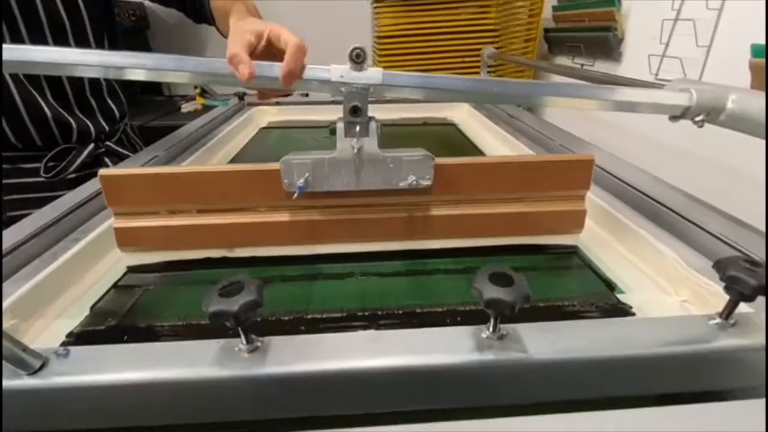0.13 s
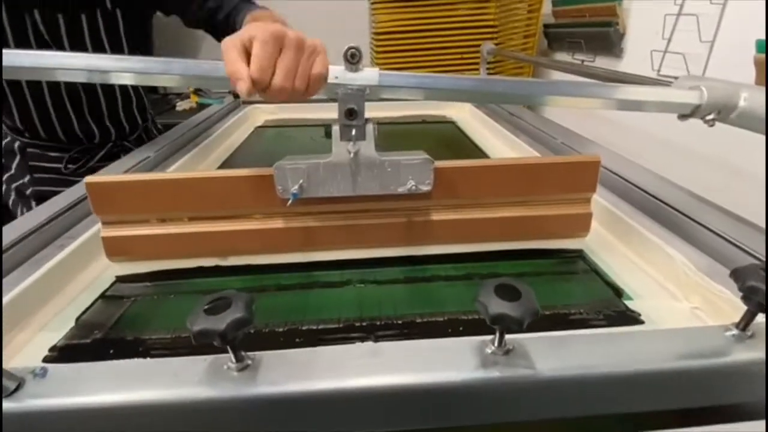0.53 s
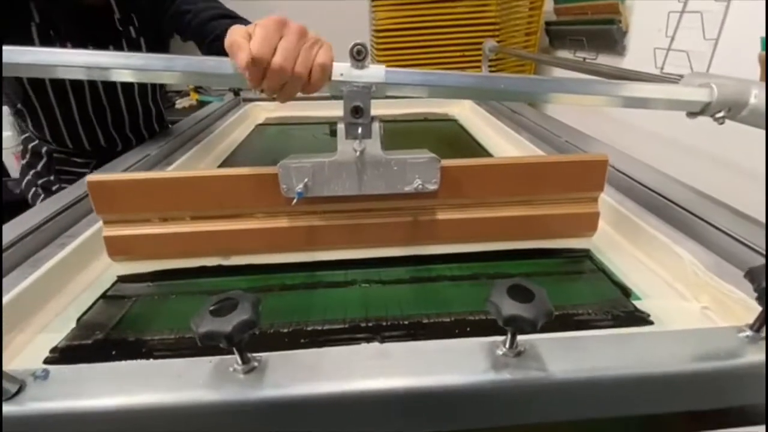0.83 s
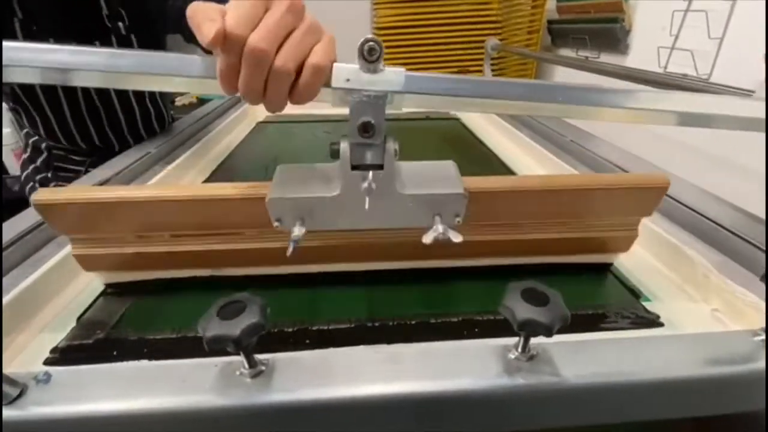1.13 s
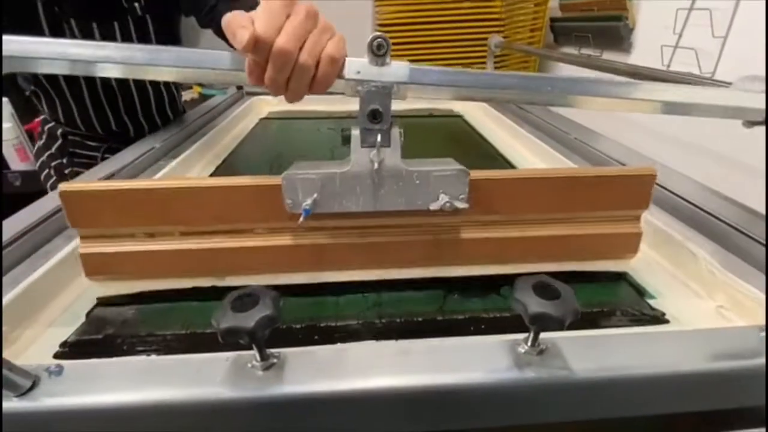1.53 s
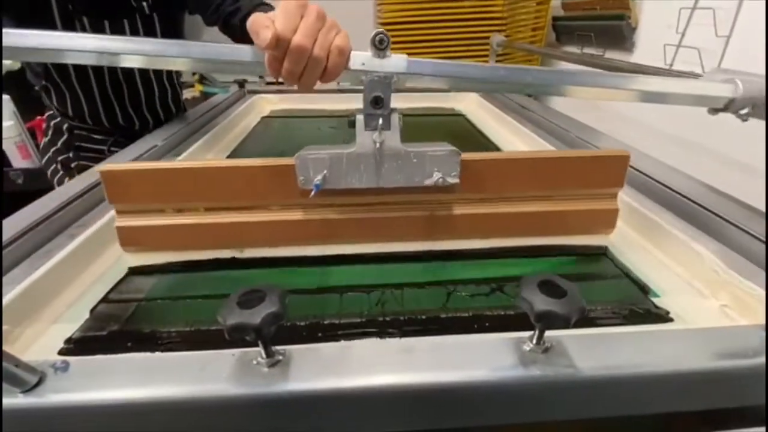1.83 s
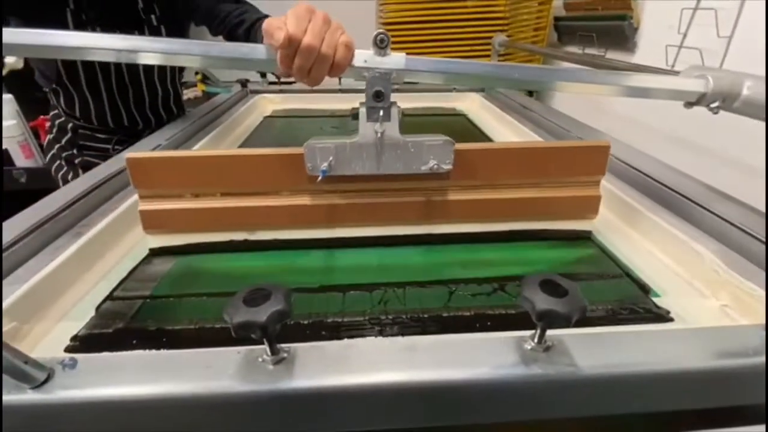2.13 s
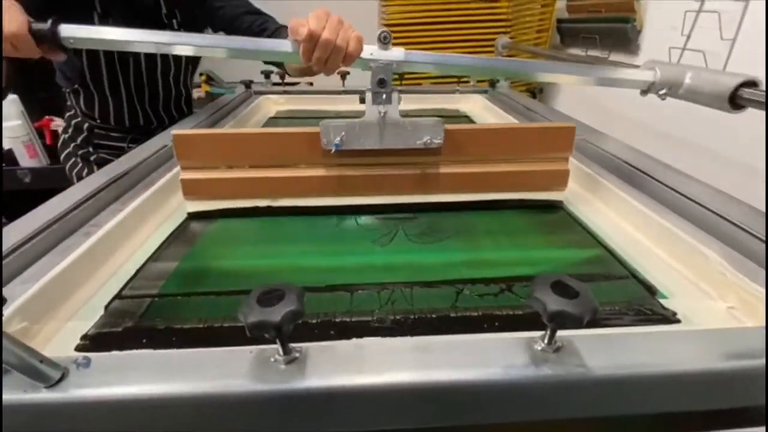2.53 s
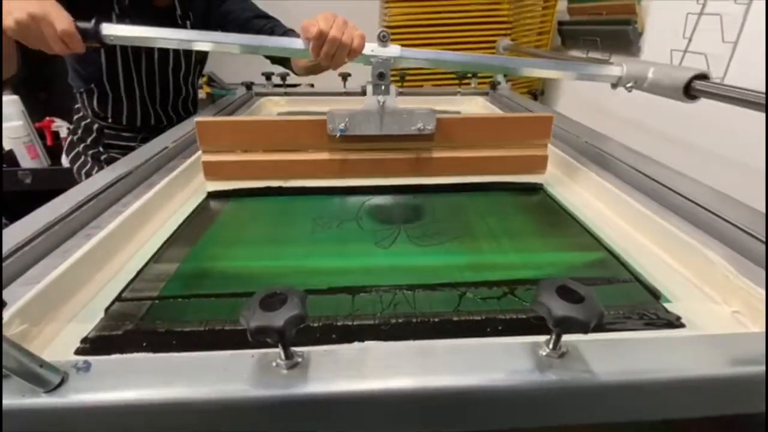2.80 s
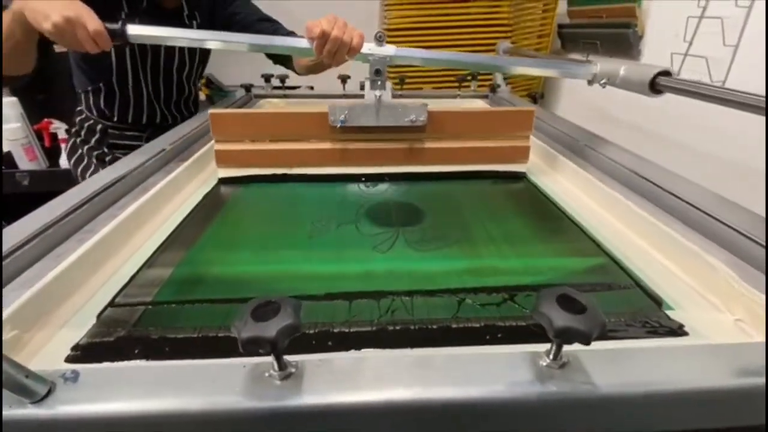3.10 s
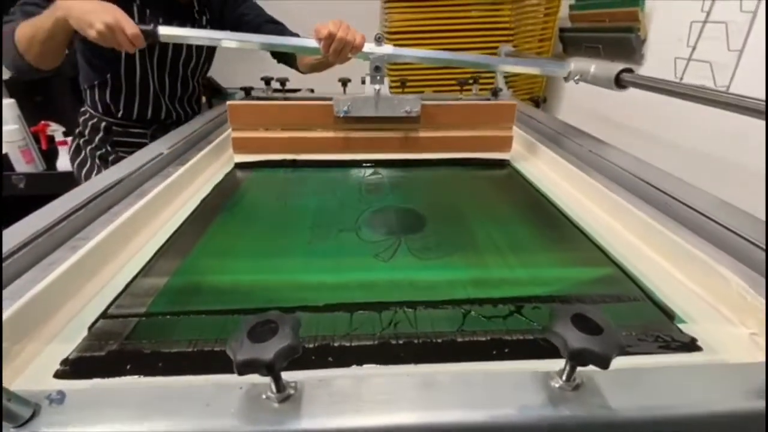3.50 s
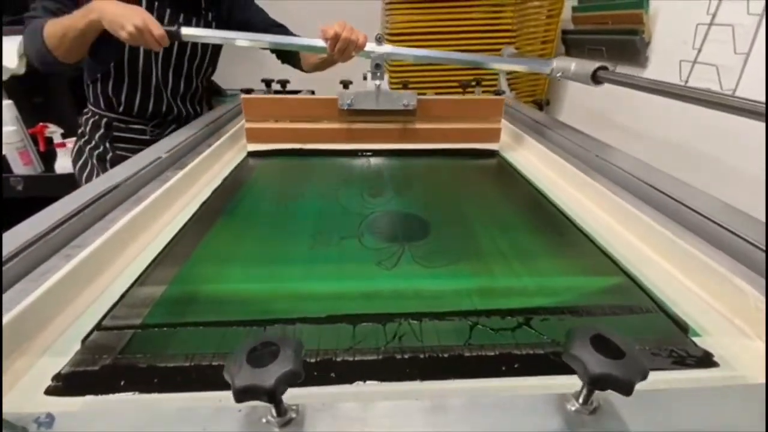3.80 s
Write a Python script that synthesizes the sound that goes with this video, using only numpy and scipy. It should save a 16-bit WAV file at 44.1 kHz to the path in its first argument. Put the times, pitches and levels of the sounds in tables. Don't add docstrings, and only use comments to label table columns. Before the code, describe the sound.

A squeegee zips across a screen-printing mesh, with a hard metallic clack, over steady fan roar

```python
import sys
import numpy as np
from scipy import signal
from scipy.fft import rfft, irfft, next_fast_len
from scipy.io import wavfile
from scipy.ndimage import uniform_filter1d, minimum_filter1d, map_coordinates

SR = 44100
rng = np.random.default_rng(int(sys.argv[2]) if len(sys.argv) > 2 else 0)


def generate_wav(signal):
    frames = np.transpose(np.atleast_2d(signal))
    scaled = np.clip(frames, -1, 1) * 32767
    pcm = np.round(scaled).astype(np.int16)
    wavfile.write(sys.argv[1], SR, pcm)


def amplitude_ratio(level_db):
    exponent = np.asarray(level_db, float) / 20
    return 10 ** exponent


N = 174195


def unit(x):
    return x / np.sqrt(np.mean(x ** 2) + 1e-20)


def along(points, hz):
    f, v = np.transpose(points)
    return np.interp(np.log(hz + 1), np.log(f + 1), v)


def wobble(rate):
    return map_coordinates(rng.standard_normal(1000), [np.arange(N) * rate / SR])


def filtered(x, response):
    m = next_fast_len(N + SR // 2)
    return irfft(rfft(x, m) * response(np.fft.rfftfreq(m, 1 / SR)), m)[..., :N]


def lean(x, points):
    return filtered(x, lambda f: amplitude_ratio(along(points, f) * [[.5], [-.5]]))


def peaks(table, f):
    power = 0
    for centre, width, db in table:
        power = power + (amplitude_ratio(db) * f * width) ** 2 / ((centre ** 2 - f ** 2) ** 2 + (f * width) ** 2)
    return np.sqrt(power)


def rush(gain, alike, patchy_db):
    z = signal.stft(rng.standard_normal((2, N)), nperseg=512)[2]
    field = uniform_filter1d(rng.standard_normal(z.shape[1:]), size=6, axis=0)
    field = uniform_filter1d(field, size=10, axis=1)
    pair = signal.istft(z * amplitude_ratio(patchy_db * unit(field)), nperseg=512)[1][:, :N]

    def share(hz):
        angle = np.arccos(np.clip(along(alike, hz), -1, 1)) / 2
        return gain(hz) * [np.cos(angle), np.sin(angle)]

    mid, side = filtered(pair, share)
    return unit(np.array([mid + side, mid - side]))


# frequency in Hz, level in dB per Hz.
FAN_ROAR = [(15, -61), (25, -23), (123, -3.5), (355, -11.5), (536, -12), (1670, -19), (8440, -41.5),
            (10600, -44.5), (11800, -82), (15300, -118), (22000, -120)]
# frequency in Hz, width in Hz, level over the roar in dB.
TABLE_CAVITIES = [(83.6, 8.6, 7), (137.2, 21.8, 11), (349.8, 33, 15), (614, 49, 3), (683, 24, 4),
                  (1656, 30, 8), (1650, 590, 2.5)]
# frequency in Hz, likeness (1 is the same).
FAN_ALIKE = [(60, 1), (170, 0.99), (490, 0.71), (1400, 0.049), (4010, 0.2), (11500, 0.075)]
# frequency in Hz, left over right in dB.
FAN_LEAN = [(60, -2), (220, 2.5), (830, 2), (3090, 2.5), (11500, -3.5)]


def fan():
    roar = rush(lambda f: amplitude_ratio(along(FAN_ROAR, f)) * np.hypot(1, peaks(TABLE_CAVITIES, f)), FAN_ALIKE, 1.64)
    level_db = -30 + 0.44 * wobble(4.4)
    return amplitude_ratio(level_db) * lean(roar, FAN_LEAN)


# middle in seconds, frequency in Hz, level in dB, half length in seconds.
BOOMS = [
    (.05, 132.7, -33.5, 0.051),
    (1.3, 127, -32.5, 0.054),
    (1.97, 139, -30.5, 0.061),
    (2.17, 141, -31, .025),
    (2.28, 144.7, -27.5, 0.048),
    (2.5, 139, -30.5, 0.035),
    (2.71, 142, -32.5, 0.024),
    (2.93, 132, -26, 0.072),
    (3.64, 138, -31.5, 0.052),
    (3.92, 131, -31, .05),
]


def booms():
    t = np.arange(N) / SR
    out = np.zeros(N)
    for s, hz, db, half_s in BOOMS:
        out += amplitude_ratio(db + 2.5) * np.exp(-((t - s) / half_s) ** 2) * np.sin(2 * np.pi * hz * (t - s))
    return out


def blur(n, width_hz):
    z = rng.standard_normal((3, n)) + 1j * rng.standard_normal((3, n))
    f = np.fft.fftfreq(n, 1 / SR)
    core = np.exp(-(f / width_hz) ** 2)
    haze = amplitude_ratio(-19) * np.exp(-(f / (width_hz + 485)) ** 2)
    z = np.fft.ifft(z * (core + haze))
    z = 0.48 * z[0] + z[1:]
    return z / np.sqrt(np.mean(abs(z) ** 2))


# time in seconds, threads passed per second in Hz, level in dB.
END_STROKE = [(0.0, 1420, -47), (0.024, 1549, -46), (0.064, 1460, -38), (0.12, 925.4, -45)]
NUDGE = [(0.955, 1525, -46), (0.966, 1613, -39), (1.03, 1660, -51)]
SHORT_STROKE = [(1.61, 1036, -40.5), (1.644, 1667, -39.5), (1.69, 1925, -39), (1.746, 1577, -34),
                (1.764, 1263, -33), (1.79, 1037, -40), (1.824, 774.5, -41), (1.868, 689, -39),
                (1.9, 659, -50)]
TWITCHES = [
    [(1.9, 1090, -41), (1.915, 1106, -39), (1.93, 1100, -48)],
    [(2.73, 1030, -46), (2.76, 1027, -41), (2.79, 1000, -49)],
    [(3.59, 1030, -49), (3.62, 1058, -43), (3.65, 1057, -49)],
]
LONG_STROKE = [
    [(2.14, 879, -51), (2.18, 1237, -46), (2.222, 1548, -47), (2.306, 1634, -43.5), (2.346, 1497, -49),
     (2.364, 1537, -38), (2.392, 1724, -40), (2.462, 2120, -43.5), (2.5, 1980, -40.5)],
    [(2.5, 2100, -39.5), (2.636, 2265, -46), (2.666, 2259, -42.5), (2.782, 1830, -42.5),
     (2.906, 1930, -45.5), (2.968, 1761, -39.5), (2.988, 1520, -39.5), (3.034, 1444, -39.5),
     (3.07, 1576, -43.5)],
    [(3.07, 1750, -44), (3.132, 1940, -46), (3.376, 1694, -41), (3.418, 1939, -39), (3.604, 2428, -41.5),
     (3.632, 2430, -42.5), (3.75, 1904, -44), (3.908, 2057, -43.5), (3.95, 1970, -41.5)],
]
OVERTONES_DB = [3.5, -8, -21.5]
BRIGHT_DB = [-4, -12, -3, -10, -10, -8, -2.5, -3.5, -7.5]
PANS_DB = [1.5, 1.5, 2, 3, 1.5, 1, 0, -1, -1]
# frequency in Hz, level in dB per Hz.
SCRAPE = [(700, 0.5), (2000, -0.5), (4000, -16), (7000, -18), (11000, -23)]
# frequency in Hz, likeness (1 is the same).
NEAR_ALIKE = [(200, 0.99), (800, 0.23), (3000, 0.085), (10000, 0.16)]


def blade():
    blur_hz, blur_at_hz = 128, 1650
    out = np.zeros((2, N))
    hiss = rush(lambda f: amplitude_ratio(along(SCRAPE, f)) * (f > 400), NEAR_ALIKE, patchy_db=1)
    shake = 1 + .017 * wobble(30)
    flutter_db = 1.2 * (wobble(21.94) + wobble(60))
    strokes = [END_STROKE, NUDGE, SHORT_STROKE, *TWITCHES, *LONG_STROKE]
    for stroke, bright_db, pan_db in zip(strokes, BRIGHT_DB, PANS_DB):
        s, hz, db = np.transpose(stroke)
        start = max(0, int((s[0] - .03) * SR))
        length = next_fast_len(int((s[-1] - s[0] + .1) * SR))
        i = np.arange(start, min(N, start + length))
        t = i / SR
        outside_s = np.maximum(s[0] - t, 0) + np.maximum(t - s[-1], 0)
        level = amplitude_ratio(np.interp(t, s, db) + flutter_db[i] - 970 * outside_s)
        speed_hz = np.interp(t, s, hz)
        phase = 2 * np.pi * np.cumsum(speed_hz * shake[i]) / SR
        pace = (phase / (2 * np.pi) * SR / blur_at_hz).astype(int) % len(i)
        tone = 0
        for k, overtone_db in enumerate(OVERTONES_DB):
            smear = blur(len(i), (k + 1) ** 1.05 * blur_hz)[:, pace]
            wave = (smear * np.exp(1j * (k + 1) * phase)).real
            tone = tone + amplitude_ratio(overtone_db + bright_db * (k > 0)) * wave
        scrape = amplitude_ratio(-4) * (speed_hz / blur_at_hz) ** .4 * hiss[:, i]
        out[:, i] += amplitude_ratio([[pan_db / 2], [-pan_db / 2]]) * level * (1.63 * tone + scrape)
    return out


def swells(rows):
    coarse = np.arange(0, N, 16) / SR
    total = 0
    for s, db, rise, fall in rows:
        slope = np.where(coarse < s, rise, -fall)
        total = total + amplitude_ratio(db - np.hypot(3, slope * (s - coarse)) + 4.5)
    return np.interp(np.arange(N) / SR, coarse, total)


TAIL_DB, TAIL_FALL = -34, 510
# peak in seconds, hiss level in dB, frame knock over the hiss in dB,
# rise in dB per second, fall in dB per second.
KNOCKS = [(0.8913, -24.5, -2, 900, 800), (.9, -45.5, 22, 1500, 502), (1.038, -49.5, 11, 102, 252),
          (1.237, -41, 7, 900, 700), (1.258, -55, 22, 600, 300), (1.408, -57.5, 19, 148, 200),
          (2.401, -27.5, -4, 603, 553), (2.385, -35, -6, 1000, 400), (2.43, -41, -3, 400, 350),
          (2.586, -54.5, 13, 124, 139), (.49, -57.5, 7, 94, 97), (1.7, -59, 0, 200, 200),
          (2.8, -57.5, 2, 80, 93), (2.26, -57.5, 0, 102, 104), (1.32, -60.5, 12, 100, 100),
          (2.355, -44, -1.5, 600, 150), (.868, -50, 8, 900, 300), (0.944, -50.5, 11, 300, 148),
          (3.17, -56.5, -6, 150, 150), (.985, -47, 3, 200, 100)]
# frequency in Hz, level in dB per Hz.
SCUFF = [(600, -9), (1200, -6.5), (2000, -8), (3000, -11.5), (6500, -11.5), (10300, -13), (11500, -21)]
# frequency in Hz, left over right in dB.
SCUFF_LEAN = [(60, 0.0), (350, 6), (1990, 5), (11500, -4.5)]


def scuffs():
    contacts = [(s, db, rise, fall) for s, db, _, rise, fall in KNOCKS]
    tails = [(s, db + TAIL_DB, rise, TAIL_FALL) for s, db, _, rise, _ in KNOCKS]
    noise = rush(lambda f: amplitude_ratio(along(SCUFF, f)) * (f > 600), NEAR_ALIKE, patchy_db=1.5)
    grit = amplitude_ratio(2 * wobble(240))
    return swells(contacts + tails) * lean(noise, SCUFF_LEAN) * grit


# frequency in Hz, width in Hz, level in dB.
FRAME = [(203, 90, -22), (238, 72, -0.5), (347, 170, -8), (505, 144, 2.5), (696, 69, -3), (1310, 380, -9.5),
         (1880, 230, -22)]


def frame_knocks():
    lag_s = 0.0025
    answers = [(s + lag_s, db + body, rise, fall * 0.94) for s, db, body, rise, fall in KNOCKS]
    tails = [(s, db + body + TAIL_DB, rise, TAIL_FALL) for s, db, body, rise, _ in KNOCKS]
    noise = rush(lambda f: peaks(FRAME, f), NEAR_ALIKE, patchy_db=2.0)
    return swells(answers + tails) * noise * amplitude_ratio([[.7], [-.7]])


# peak in seconds, level in dB, rise in dB per second, fall in dB per second.
SLAPS = [
    (0.84, -38, 500, 500),
    (1.227, -37, 1200, 700),
    (1.239, -33.5, 1000, 600),
    (1.252, -37, 900, 350),
    (1.385, -38.5, 600, 500),
    (1.6, -41.5, 500, 400),
    (.965, -37.5, 900, 300),
    (1.288, -37.5, 1200, 900),
    (1.05, -45, 198, 150),
]
# frequency in Hz, width in Hz, level in dB.
MESH = [(1140, 470, -2.5), (1610, 360, 2.2), (2100, 320, 0), (2470, 250, -5.5)]


def mesh_slaps():
    return swells(SLAPS) * rush(lambda f: peaks(MESH, f) ** 2, NEAR_ALIKE, patchy_db=-2.8)


def ring(s, db, modes, rise_s):
    u = np.arange(SR // 4) / SR
    turns = rng.uniform(0, 2 * np.pi, (len(modes), 1, 1)) + rng.normal(0, 0.5, (len(modes), 2, 1))
    wave = 0
    for (hz, mode_db, t60), turn in zip(modes, turns):
        wave = wave + amplitude_ratio(db + mode_db - 60 * u / t60) * np.sin(2 * np.pi * hz * u + turn)
    wave = wave * (1 - np.exp(-u / rise_s))
    return np.pad(wave, ((0, 0), (round(s * SR), N)))[:, :N]


# frequency in Hz, level in dB, seconds to fade by 60 dB.
ARM = [(181.7, -7, 0.18), (254.6, -4.5, 0.15), (412, -8, 0.11), (479, 3.5, 0.12), (709, -1, 0.099),
       (1320, -9, .1), (4390, -16, 0.052)]
CLINK = [(6650, 0, .012), (8100, -7, .01)]


def arm_stop():
    return ring(.892, -13.5, ARM, rise_s=0.0012) + ring(.895, -13, CLINK, rise_s=0.0012)


# frequency in Hz, level in dB, seconds to fade by 60 dB.
LANDING = [(348, -9, 0.17), (409, -4, .07), (455, 5, 0.07), (540, -6, 0.3), (4840, -11, 0.035)]


def landing():
    u = np.maximum(np.arange(N) / SR - 1.26, 0)
    fade = amplitude_ratio(-23.5 - 60 * u / 0.31) * (1 - np.exp(-u / .012))
    thump = fade * np.sin(2 * np.pi * 51 * u)
    return ring(1.234, -22, LANDING, rise_s=0.0033) + thump


def scene():
    contacts = scuffs() + frame_knocks() + mesh_slaps() + arm_stop() + landing()
    return fan() + booms() + blade() + contacts


def roll_off(x):
    return signal.sosfilt(signal.butter(12, 12080, fs=SR, output="sos"), x)


# frequency in Hz, width in Hz, rarity in spreads.
GAPS = [(7000, 170, .1), (7170, 180, -.7), (7380, 250, -1), (7600, 150, 1.8), (11130, 180, -.1),
        (11310, 190, -.8), (11500, 200, -1.6), (12100, 1000, -2.6), (2500, 180, 1.3), (4200, 250, .9),
        (4450, 200, 1.3), (2900, 200, 1.2), (2050, 120, 1.5), (5000, 250, 1.6)]


def record(dry):
    ceiling = 0.87
    x = dry / (1 + abs(dry / ceiling) ** 4) ** (1 / 4)
    mid_side = np.array([x[0] + x[1], x[0] - x[1]]) / 2
    hz, _, z = signal.stft(np.pad(mid_side, ((0, 0), (64, 0))), SR, "cosine", 2048)
    near = np.sqrt(uniform_filter1d(abs(z) ** 2, size=16, axis=1).clip(1e-20))
    thin = (abs(z) / near + 1e-9) ** (0.52 * np.clip(hz / 1430 - .5, 0, 1))[:, None]
    loud = near[:, 400] > 9 * np.median(near[:, 400])
    for centre, width, rare in GAPS:
        off = unit(uniform_filter1d(rng.standard_normal(loud.shape), size=2, axis=1)) > rare
        off = off & (~loud | (centre > 11000))
        thin[:, abs(hz - centre) < width / 2] *= np.where(off, 0, 1)[:, None]
    below = np.roll(-minimum_filter1d(-near, size=20, axis=1), 24, axis=1)
    hidden = abs(z) < np.maximum(amplitude_ratio(-14) * below, .65 * near)
    thin *= np.where(hidden & (hz > 1900)[:, None], 0, 1)
    edge = 1 / (1 + np.exp(np.clip((hz - 11850) / 60, -50, 50)))
    mid, side = signal.istft(z * thin * edge[:, None], SR, "cosine", 2048)[1][:, 64:N + 64]
    return roll_off(np.array([mid + side, mid - side]))


dry = scene()
out = record(dry)
generate_wav(out)
```